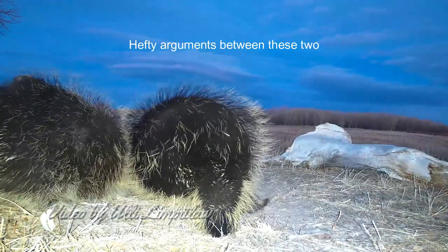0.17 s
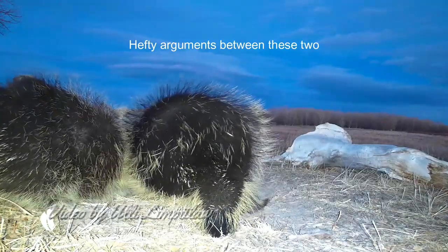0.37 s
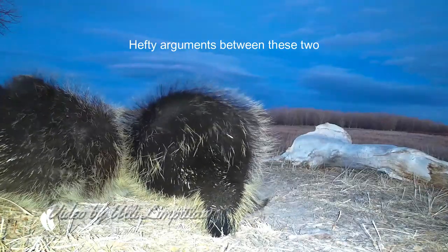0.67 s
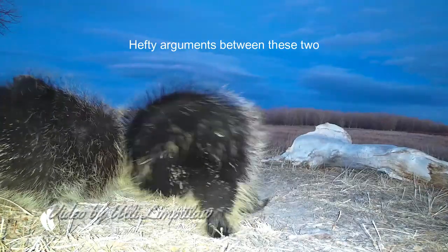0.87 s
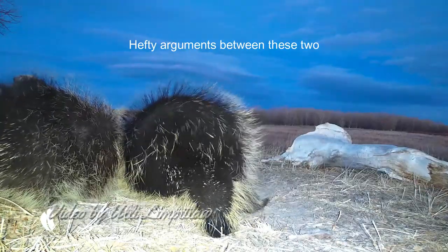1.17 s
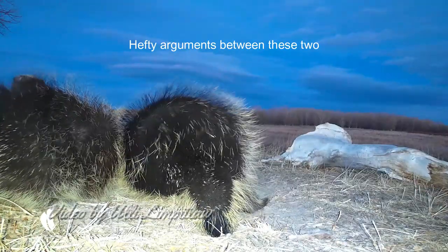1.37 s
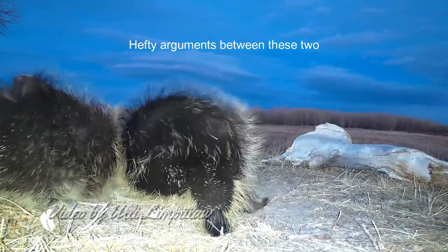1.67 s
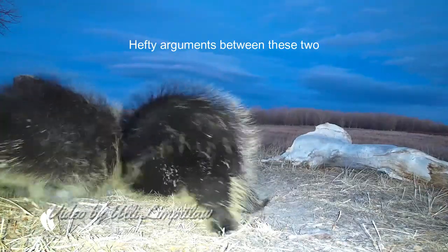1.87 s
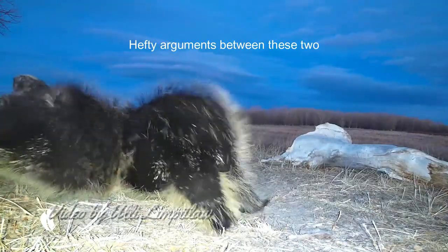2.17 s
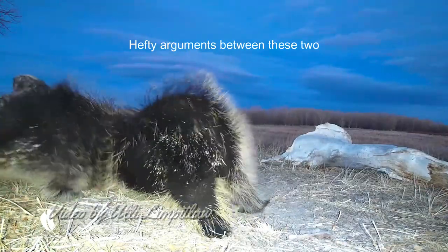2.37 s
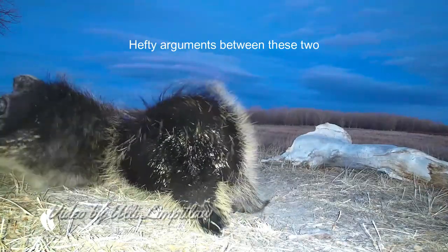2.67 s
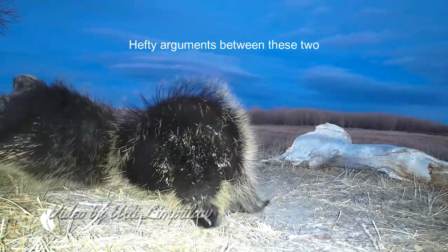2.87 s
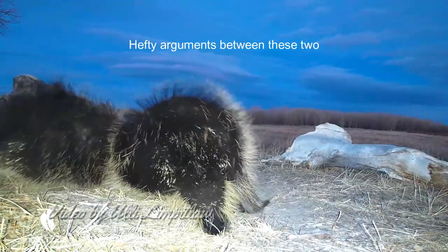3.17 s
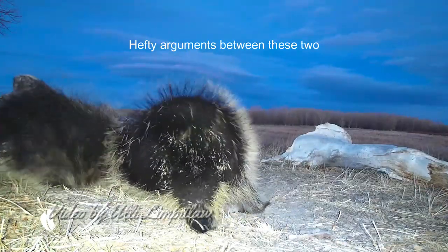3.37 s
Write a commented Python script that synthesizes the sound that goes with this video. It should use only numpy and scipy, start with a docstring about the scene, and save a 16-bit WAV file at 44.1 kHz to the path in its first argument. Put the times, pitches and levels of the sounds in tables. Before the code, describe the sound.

Porcupine cries, thin squeals plunging into low nasal creaking moans, over straw thumps and rumble.

```python
"""A straw bed, close to the microphone: two porcupines quarrel in four cries. Three start as a thin squeal
and plunge about two octaves into a low, nasal, creaking moan; the third is a short moan alone.
Trains of vocal-fold pulses sound chest, mouth and upper throat. Shuffling makes dull thumps, each a low
push with a burst of shaken bedding, and a swelling rumble of filtered noise. Single coloured clicks make
the snaps of straw and two hard late pulses of the voice, over a faint hiss."""
import sys
import numpy as np
from scipy import signal
from scipy.fft import rfft, irfft, next_fast_len
from scipy.io import wavfile
from scipy.ndimage import uniform_filter1d, map_coordinates

SR = 44100
rng = np.random.default_rng(int(sys.argv[2]) if len(sys.argv) > 2 else 0)


def generate_wav(sig):
    """Save sig (samples, or channels by samples) to the path in sys.argv[1] as 16-bit PCM at SR."""
    pcm = np.round(np.clip(np.atleast_2d(sig).T, -1, 1) * 32767).astype(np.int16)
    wavfile.write(sys.argv[1], SR, pcm)


N = 156555


def amp(db):
    """Decibels to gain."""
    return 10 ** (np.asarray(db) / 20)


def unit(x):
    """Scale to rms 1."""
    return x / np.sqrt(np.mean(x ** 2) + 1e-20)


def curves(rows):
    """One value per sample for each column after the time."""
    s, *columns = np.transpose(rows)
    return [np.interp(np.arange(N) / SR, s, column) for column in columns]


def wobble(knots_per_s):
    """A smooth random curve through evenly spaced knots."""
    knots = rng.standard_normal(2048)
    return map_coordinates(knots, [np.arange(N) * knots_per_s / SR], mode='mirror')


def filtered(x, response):
    """x through a causal, minimum-phase filter with the given gain over frequency."""
    m = 2 * next_fast_len(N // 2 + 8192)
    gain = np.abs(response(np.fft.rfftfreq(m, 1 / SR)))
    cepstrum = irfft(np.log(np.maximum(gain, 1e-6)), m)
    # folding the cepstrum onto positive times makes the filter causal
    cepstrum[1:m // 2] *= 2
    cepstrum[m // 2 + 1:] = 0
    return irfft(rfft(x, m) * np.exp(rfft(cepstrum)), m)[:N]


def colour(x, points):
    """x shaped by (Hz, dB) points on a log frequency axis."""
    f, db = np.transpose(points)
    return filtered(x, lambda hz: amp(np.interp(np.log(hz + 1), np.log(f), db)))


def resonate(x, modes, levels_db):
    """x through steep-sided resonances (Hz, width Hz)."""
    def response(f):
        return sum(amp(db) / (1 + (2 * (f - centre) / width) ** 2) ** 1.95
                   for (centre, width), db in zip(modes, levels_db))
    return filtered(x, response)


def loudness(x):
    """Running rms over a few pulses."""
    power = uniform_filter1d(uniform_filter1d(x * x, size=600), size=450)
    return np.sqrt(np.abs(power) + 1e-12)


def burst(start_s, decay_s):
    """Noise that starts at once and dies away."""
    t = np.arange(N) / SR - start_s
    return (t >= 0) * np.exp(-np.abs(t) / decay_s) * rng.standard_normal(N)


# spectrum of the hiss: frequency_hz, relative_level_db
HISS_COLOUR = [(70, -16), (160, 0.5), (350, -8.5), (850, -20.5), (2500, -30), (15000, -36)]
HISS_DB = -50  # rms


def hiss():
    """Steady noise, fullest in the lows, with a faint airy top."""
    return amp(HISS_DB) * unit(colour(rng.standard_normal(N), HISS_COLOUR))


# swells of the rumble: time_s, level_db
RUMBLE_LEVEL = [(0, -24.5), (.18, -22.5), (.27, -11.5), (.4, -19.5), (.6, -20), (.78, -20), (1.19, -27),
                (1.27, -12.5), (1.85, -11.5), (1.91, -24.5), (2.08, -10), (2.23, -26), (2.55, -16),
                (2.85, -28.5), (3.1, -26.5), (3.22, -16.5), (3.35, -29.5), (3.55, -15.5)]
# spectrum of the rumble: frequency_hz, relative_level_db
RUMBLE_COLOUR = [(22, 7.5), (45, -3.5), (80, -16), (150, -25.5), (300, -45), (800, -85)]


def rumble():
    """Deep noise that swells as the animals shift."""
    level_db, = curves(RUMBLE_LEVEL)
    return amp(level_db) * unit(colour(rng.standard_normal(N), RUMBLE_COLOUR))


ROOM_DB, ROOM_T60_S = -16, 0.16  # echo level against the direct sound; time to fall 60 dB


def room(x):
    """A weak, short echo of the surroundings: a decaying noise tail added to x."""
    t = np.arange(SR // 2) / SR
    tail = rng.standard_normal(len(t)) * np.exp(-np.log(1000) * t / ROOM_T60_S)
    return x + amp(ROOM_DB) * signal.fftconvolve(x, tail / np.linalg.norm(tail))[:N]


# short bright clicks: straw snaps, and two hard pulses of the voice late in the plunges of
# cries 1 and 4 (.784, 3.23): time_s, impulse_db before colouring
CLICKS = [(0.039, -27), (.3029, -16.5), (.416, -30.5), (.784, -26), (1.460, -21), (1.5913, -33.5),
          (3.23, -23)]
# spectrum of a click: frequency_hz, gain_db
CLICK_COLOUR = [(1500, 10), (6000, -5), (15000, -11)]


def bright_clicks():
    """Straw snaps and two hard voice pulses, each a single coloured impulse."""
    impulses = np.zeros(N)
    for s, db in CLICKS:
        impulses[round(s * SR)] = amp(db)
    return colour(impulses, CLICK_COLOUR)


# footfalls and bumps: time_s, push_peak_db, strongest_hz
THUMPS = [(0.279, 1.5, 12.3), (.291, -21, 150), (.302, -3.5, 47.3), (0.459, -5, 14.3), (1.255, -5.5, 18.5),
          (1.345, -10, 62), (1.433, -2, 22.3), (1.448, -7, 60.6), (1.502, -5, 58), (1.524, -5, 27.5),
          (1.781, -10.5, 77), (1.797, -5.5, 87), (1.832, -12, 52), (2.123, -12, 44), (2.943, -12.5, 36),
          (3.248, -8.5, 47.2)]
# spectrum of the shaken bedding: frequency_hz, gain_db
BEDDING_COLOUR = [(50, -9.5), (130, 7), (230, -4), (400, -11), (800, -26.5), (2000, -84.5)]
BEDDING_DECAY_S = 0.012


def thumps():
    """Each soft contact is one low push without a ring; the sharper it is, the more the bedding shakes."""
    push, shake = np.zeros(N), np.zeros(N)
    usual_hz = np.mean([row[2] for row in THUMPS])
    for s, db, hz in THUMPS:
        u = 2 * np.pi * hz * (np.arange(N) / SR - s)
        push += amp(db) * (u * u - 1) / (1 + u * u) ** 2
        shake += amp(db) * (hz / usual_hz) ** 1.52 * burst(s, BEDDING_DECAY_S)
    return push + colour(shake, BEDDING_COLOUR)


# unevenness at each cry's lowest pitch (spread of random values): timing, pulse size, treble bite
JITTER_CYCLES, SHIMMER_DB, BITE_DB = 0.0099, 2.5, 2.5
RASP_DB, TREBLE_RASP_DB = -27, -11  # air against the pulses; the treble one is for the lowest pitch
CATCH_S = 0.009  # the folds settle with this time constant at the start of a cry


def pulse_train(taps, shape, sizes):
    """Pulses of the given sizes, each a short sinc placed between samples."""
    places = np.clip(taps, 0, N - 1).ravel()
    return unit(np.bincount(places, (shape * sizes[:, None]).ravel(), N))


def vocal_folds(pitch, catch_cycles):
    """One pulse per fold closing, with a puff of air; the first and the slow ones come less evenly.
    Gives a plain train, and a bright one whose bite differs from pulse to pulse."""
    hz, = curves(pitch)
    hz = uniform_filter1d(hz, size=220)
    phase = np.cumsum(hz) / SR  # cycles
    at = np.interp(np.arange(1, int(phase[-1])), phase, np.arange(N))
    rate = hz[at.astype(int)]
    slack = hz.min() / rate  # 1 at the lowest pitch
    scatter, shimmer, bite = rng.standard_normal((len(at), 3)).T

    unsettled = catch_cycles * np.exp(-np.abs(at / SR - pitch[0][0]) / CATCH_S)
    at = at + (JITTER_CYCLES * slack + unsettled) * SR / rate * scatter
    taps = at.astype(int)[:, None] + np.arange(-7, 9)
    u = taps - at[:, None]
    shape = np.sinc(u) * np.cos(np.pi * u / 16) ** 2

    size = amp(SHIMMER_DB * slack * shimmer) * np.sqrt(slack)
    puffs = rng.standard_normal(N) * (1 + np.cos(2 * np.pi * phase))
    air = unit(puffs * np.sqrt(hz.min() / hz))
    plain = pulse_train(taps, shape, size) + amp(RASP_DB) * air
    bright = pulse_train(taps, shape, size * amp(BITE_DB * slack * bite))
    # the treble of a slow creak is airier
    return plain, bright + amp(TREBLE_RASP_DB) * (hz.min() / hz) ** 2 * air


# mouth resonance, rising as the jaw opens: time_s, centre_hz
MOUTH = [(.79, 1383), (.87, 1260), (.94, 1410), (1.73, 1445), (1.81, 1630), (1.97, 1520), (2.13, 1766),
         (2.24, 1490), (3.22, 1625), (3.42, 1460)]
MOUTH_WIDTH_HZ = 271


def mouth(x):
    """x through the moving resonance of the mouth: shifted down to 0 Hz, low-passed, shifted back."""
    hz, = curves(MOUTH)
    turn = np.exp(2j * np.pi * np.cumsum(hz) / SR)
    lowpass = signal.butter(2, MOUTH_WIDTH_HZ / 2, fs=SR, output='sos')
    return (signal.sosfilt(lowpass, x / turn) * turn).real


# upper throat resonances: centre_hz, width_hz
THROAT = [(3450, 893), (4480, 1170), (6250, 1800), (7700, 830)]
LOWER_SHARE = 0.35  # how far the lower main resonance sinks as the upper one rises
UPPER_FADE_DB = 13  # the upper one weakens by this much per octave that it rises


def throat(x, rise_octaves, levels_db):
    """x through the upper throat, fading between fixed shapes as its two main resonances move apart."""
    (lower, lower_width), (upper, upper_width), *top = THROAT
    rises = np.linspace(-.14, .42, 5)
    upper_only = np.eye(len(THROAT))[1]
    total = np.zeros(N)
    for rise, share in zip(rises, np.eye(len(rises))):
        modes = [(lower / 2 ** (LOWER_SHARE * rise), lower_width), (upper * 2 ** rise, upper_width), *top]
        shaped = resonate(x, modes, levels_db - UPPER_FADE_DB * rise * upper_only)
        total += np.interp(rise_octaves, rises, share) * shaped
    return total


# pitch of each cry: time_s, pitch_hz
PITCH_1 = [(.699, 949.2), (.706, 846.5), (.722, 827), (.735, 760.4), (.745, 653), (.755, 479.7),
           (.777, 277.8), (.795, 208.9), (.845, 186.8), (.91, 200.1), (1.0, 183.7)]
PITCH_2 = [(1.705, 680.2), (1.712, 737), (1.733, 747.6), (1.76, 487.4), (1.775, 337), (1.79, 232.1),
           (1.81, 173), (1.84, 147.2), (1.94, 146.4), (2.05, 172.5), (2.16, 155.6), (2.23, 128.1)]
PITCH_3 = [(2.28, 186), (2.33, 166.9), (2.5, 157)]
PITCH_4 = [(3.122, 1011), (3.145, 922), (3.16, 834.3), (3.173, 716), (3.187, 467.7), (3.2, 301.6),
           (3.215, 208.4), (3.24, 171.2), (3.31, 179.4), (3.37, 202.1), (3.55, 186.5)]
# levels of each cry, before flutter: time_s, mouth_db, treble_db
LEVELS_1 = [(0.695, -49, -51), (.705, -50.5, -35.5), (0.742, -35.5, -28), (0.793, -33.5, -31.5),
            (.822, -48, -61.5), (.858, -57.5, -71), (.932, -49, -68), (.965, -58, -70), (1.12, -75, -82)]
LEVELS_2 = [(1.694, -60, -98), (1.709, -39, -43), (1.723, -26.5, -43), (1.736, -27, -25),
            (1.759, -34, -28.5), (1.83, -46.5, -48), (1.884, -47.5, -61), (1.897, -45.5, -53.5),
            (1.97, -48.5, -58), (2.05, -43, -56), (2.095, -46.5, -67), (2.195, -52.5, -69),
            (2.229, -50, -64), (2.256, -62, -75)]
LEVELS_3 = [(2.269, -61, -72), (2.31, -53, -71), (2.371, -57.5, -77), (2.385, -52.5, -61),
            (2.51, -66.5, -86)]
LEVELS_4 = [(3.119, -57, -71), (3.128, -45, -44.5), (3.166, -34, -36), (3.21, -43, -49.5),
            (3.23, -43.5, -44.5), (3.245, -49.5, -66), (3.285, -54, -61.5), (3.32, -57, -72),
            (3.56, -64, -79)]
# the four cries: pitch, levels, catch_cycles (unevenness of the first pulses), chest_db,
# chest_growth_db_per_octave of pitch, second_throat_resonance_db, third_throat_resonance_db
CRIES = [(PITCH_1, LEVELS_1, 0.014, -3.46, 2.7, -6, -20),
         (PITCH_2, LEVELS_2, 0.07, -4.5, 0.16, -1.2, -23.5), (PITCH_3, LEVELS_3, 0.057, -1.6, 1.9, 0, -9),
         (PITCH_4, LEVELS_4, 0, -0.15, 1.3, -10, -13)]
# spectrum of the chest tone: frequency_hz, relative_level_db
CHEST_COLOUR = [(90, -8.5), (190, 11), (300, 1), (750, -10), (980, -14), (1250, -9), (2000, -40),
                (9000, -53)]
# the upper main throat resonance lifts in the long moan: time_s, rise_octaves
THROAT_RISE = [(1.97, 0), (2.07, 0.33), (2.16, 0)]
# base chest level in a soft moan of this mouth level and pitch; chest dB per dB of mouth level
CHEST_DB, MOAN_DB, MOAN_HZ, CHEST_FOLLOWS = -50, -52, 180, 0.64
THROAT_TOP_DB = -33.5  # the highest resonance
# random drift at the lowest pitch: treble level, throat rise; knots per second of both
FLUTTER_DB, DRIFT_OCTAVES, FLUTTER_PER_S = 2.4, 0.019, 55


def cry(pitch, levels, catch_cycles, chest_db, octave_db, second_db, third_db):
    """One pulse train sounds chest, mouth and upper throat; the chest tone grows with effort and pitch."""
    t = np.arange(N) / SR
    folds, bright = vocal_folds(pitch, catch_cycles)
    hz, = curves(pitch)
    mouth_db, treble_db = curves(levels)
    slack = hz.min() / hz
    flutter_db = FLUTTER_DB * slack * wobble(FLUTTER_PER_S)  # a slow creak comes and goes

    effort_db = CHEST_FOLLOWS * (mouth_db - MOAN_DB)
    low_db = CHEST_DB + chest_db + effort_db + octave_db * np.log2(hz / MOAN_HZ)
    chest = colour(folds, CHEST_COLOUR)
    # the chest is levelled by its overtones above 300 Hz
    highpass = signal.butter(4, 300, 'high', fs=SR, output='sos')
    overtones = signal.sosfiltfilt(highpass, chest)

    vowel = mouth(folds)
    rise = curves(THROAT_RISE)[0] + DRIFT_OCTAVES * slack ** 2 * wobble(FLUTTER_PER_S)
    treble = throat(bright, rise, [0, second_db, third_db, THROAT_TOP_DB])

    voice = amp(low_db + flutter_db / 2) * chest / loudness(overtones)
    voice += amp(mouth_db + flutter_db / 2) * vowel / loudness(vowel)
    voice += amp(treble_db + flutter_db) * treble / loudness(treble)
    # 10 ms fades at both ends
    gate = np.clip(np.minimum(t - levels[0][0], levels[-1][0] - t) / .01, 0, 1)
    return gate * voice


def scene():
    """Hiss, rumble, bright clicks, thumps and echoing cries in one channel."""
    cries = room(sum(cry(*row) for row in CRIES))
    return (hiss() + rumble() + bright_clicks() + thumps() + cries)[None]


CLIP_TOP, TOP_HZ = 0.72, 15600  # ceiling of the rounding (full scale 1); band limit


def record(dry):
    """The recorder rounds off the biggest peaks and keeps nothing above its band limit."""
    rounded = dry / (1 + (dry / CLIP_TOP) ** 8) ** (1 / 8)
    m = next_fast_len(N + SR // 2)
    in_band = np.fft.rfftfreq(m, 1 / SR) < TOP_HZ
    return irfft(rfft(rounded, m) * in_band, m)[..., :N]


dry = scene()
out = record(dry)
generate_wav(out)
```